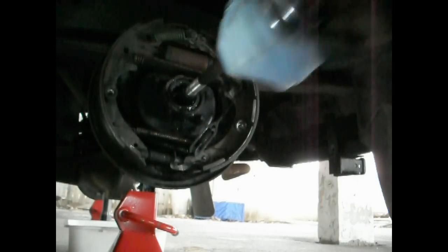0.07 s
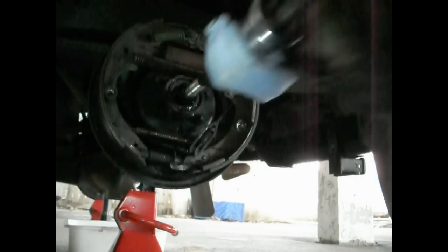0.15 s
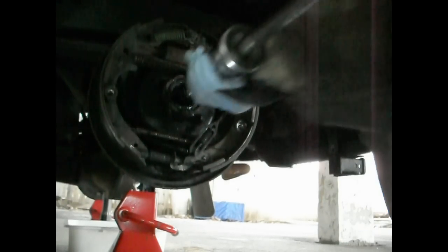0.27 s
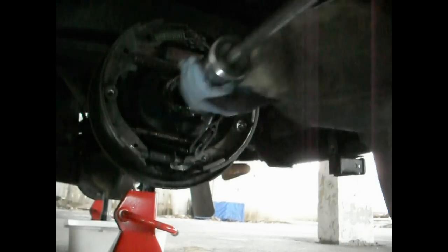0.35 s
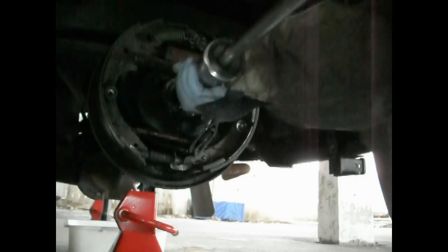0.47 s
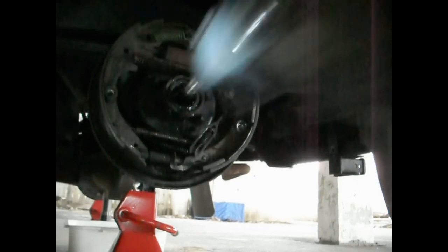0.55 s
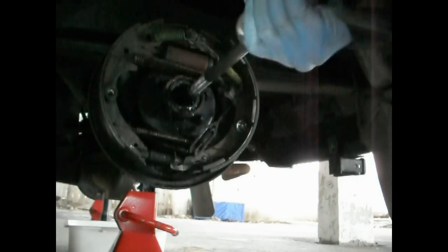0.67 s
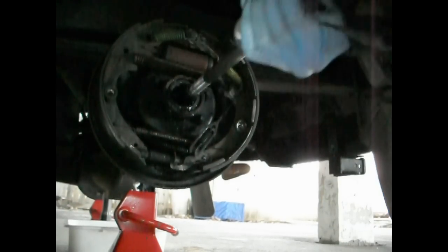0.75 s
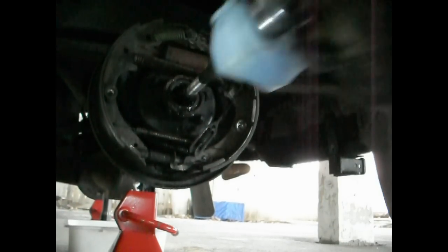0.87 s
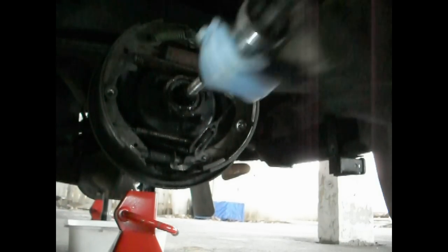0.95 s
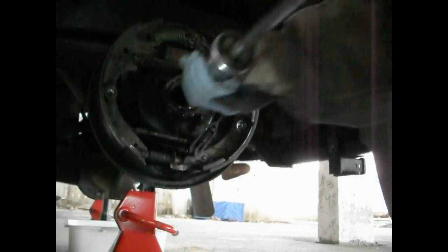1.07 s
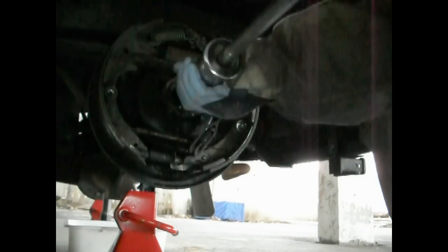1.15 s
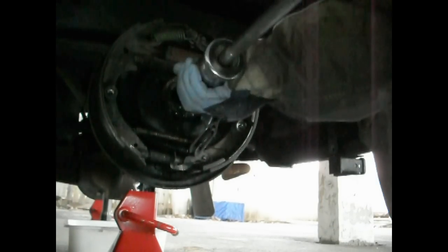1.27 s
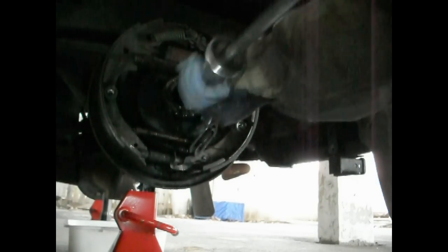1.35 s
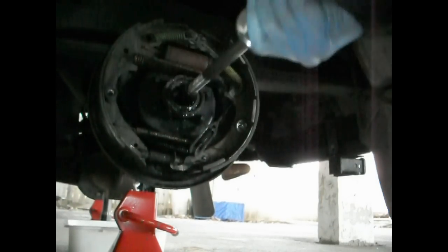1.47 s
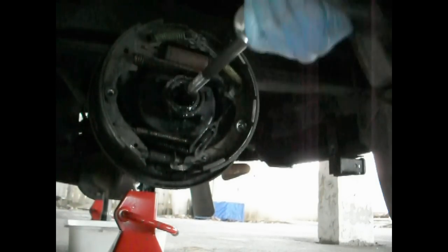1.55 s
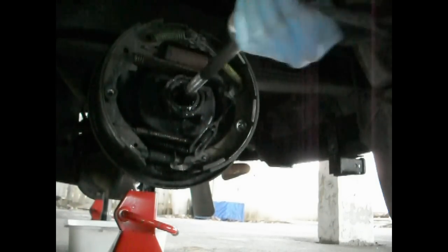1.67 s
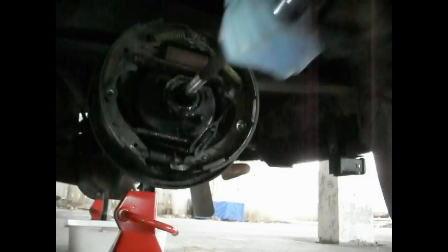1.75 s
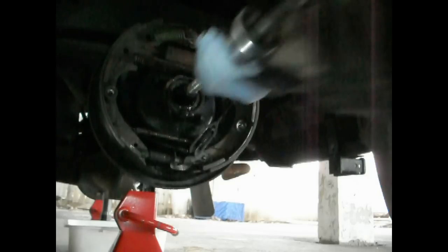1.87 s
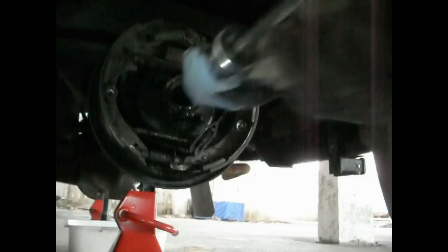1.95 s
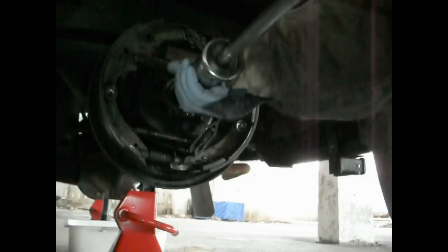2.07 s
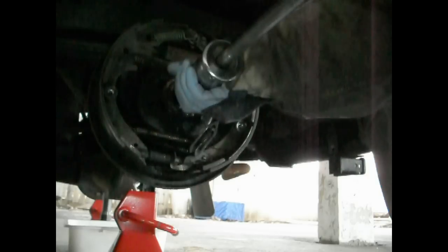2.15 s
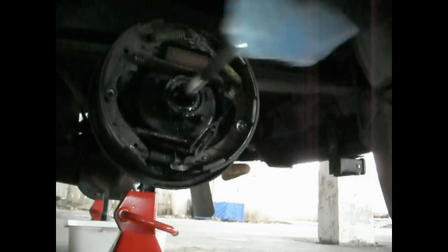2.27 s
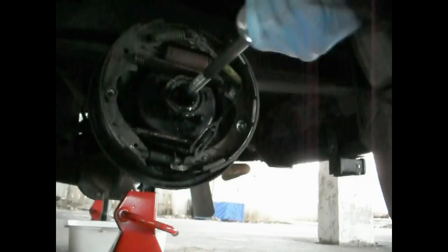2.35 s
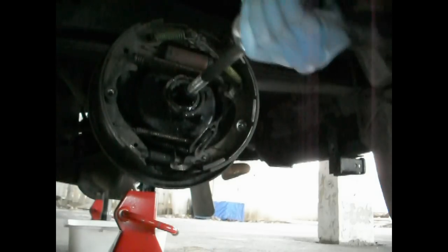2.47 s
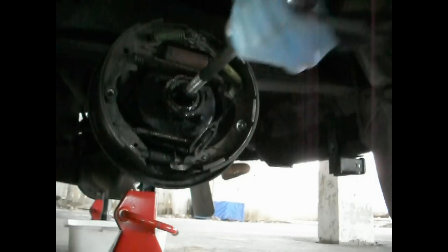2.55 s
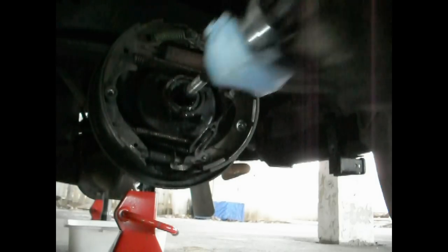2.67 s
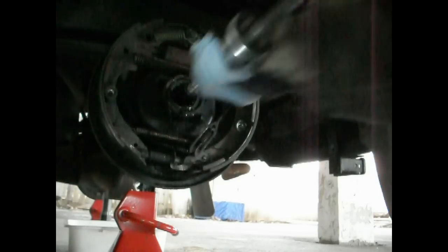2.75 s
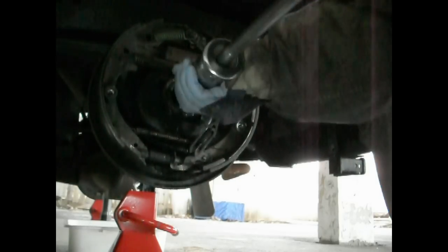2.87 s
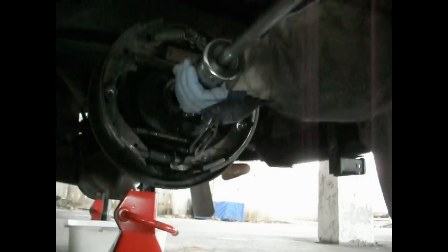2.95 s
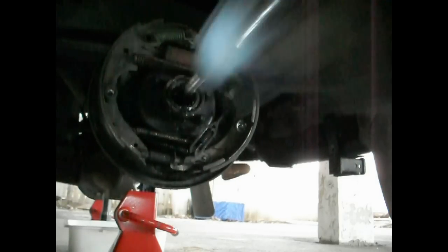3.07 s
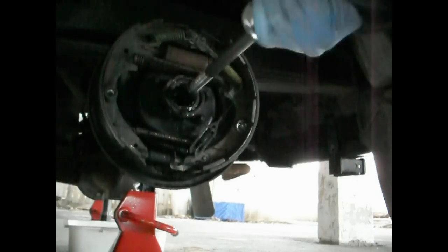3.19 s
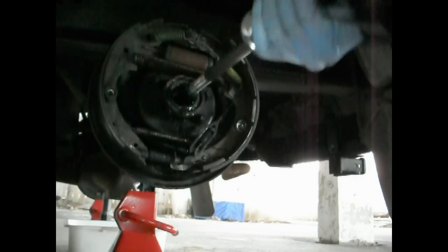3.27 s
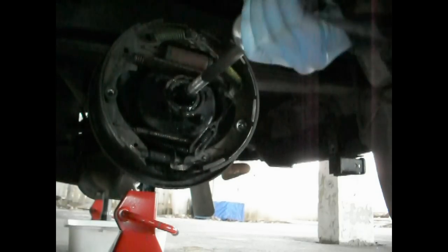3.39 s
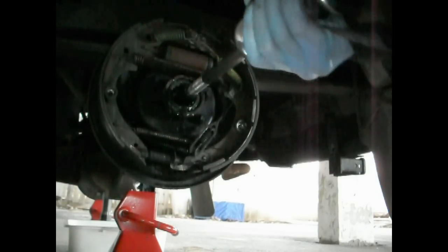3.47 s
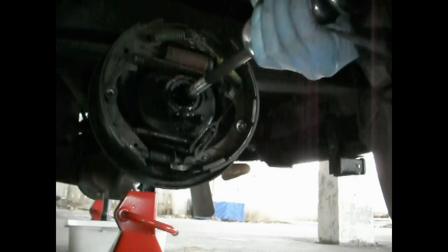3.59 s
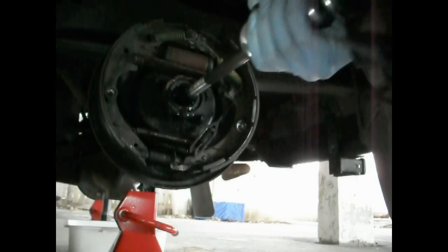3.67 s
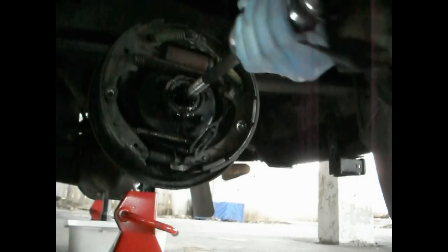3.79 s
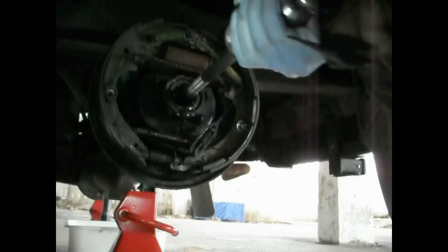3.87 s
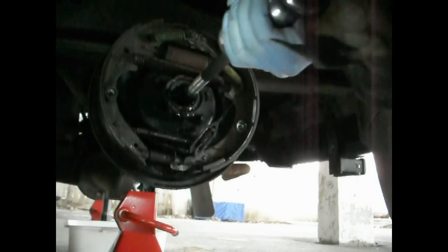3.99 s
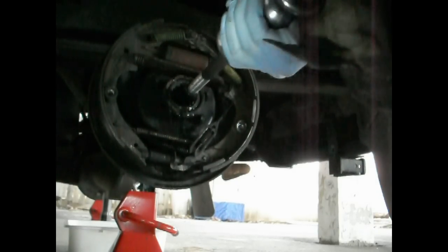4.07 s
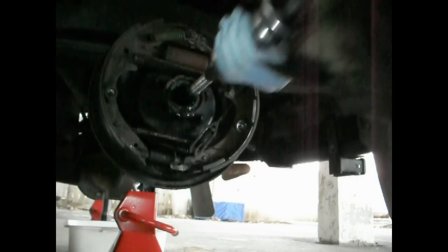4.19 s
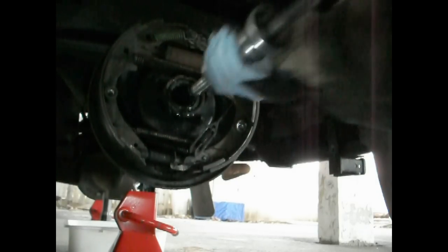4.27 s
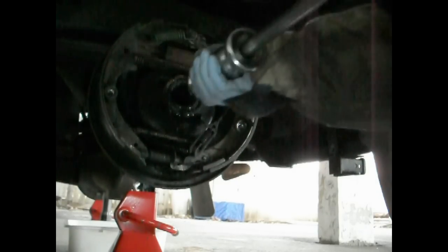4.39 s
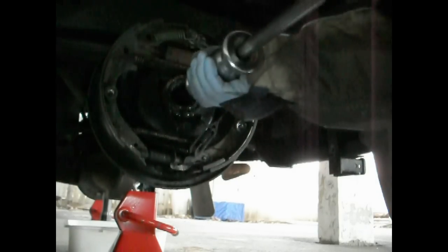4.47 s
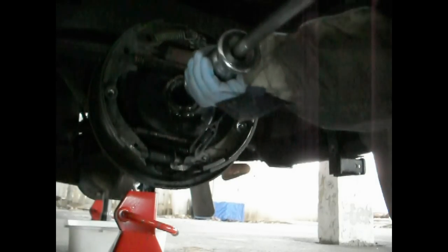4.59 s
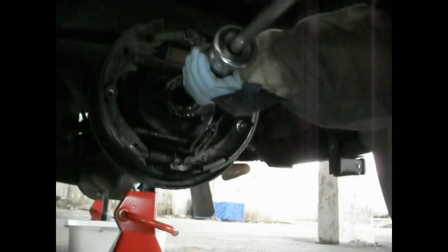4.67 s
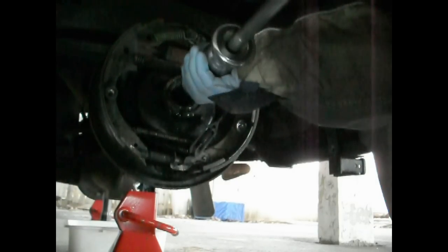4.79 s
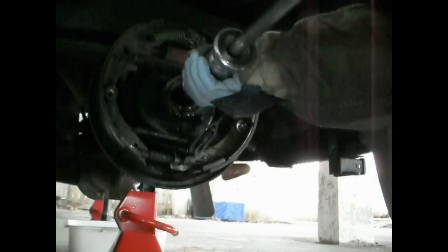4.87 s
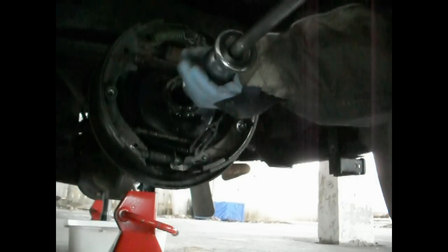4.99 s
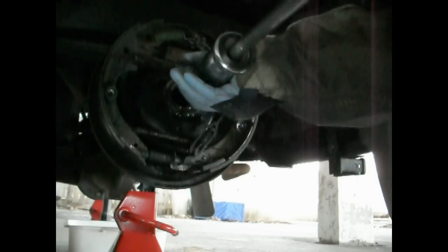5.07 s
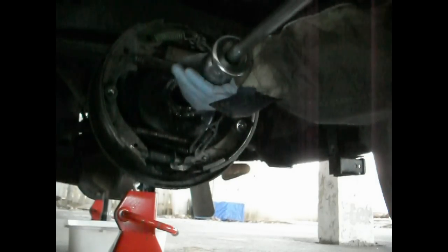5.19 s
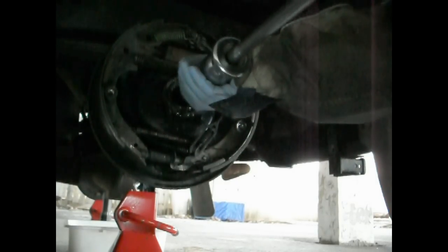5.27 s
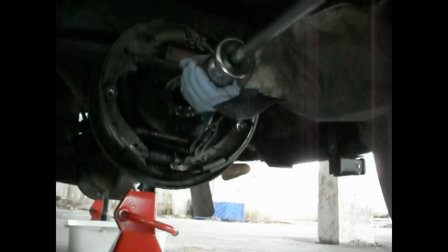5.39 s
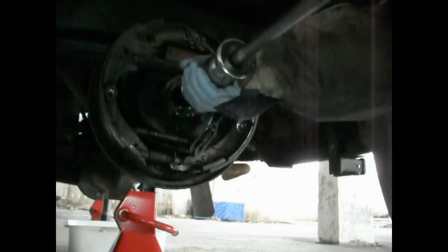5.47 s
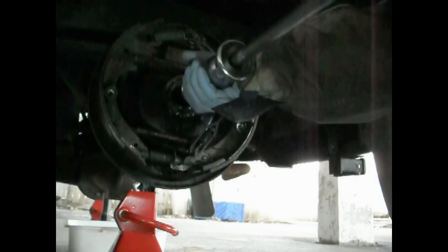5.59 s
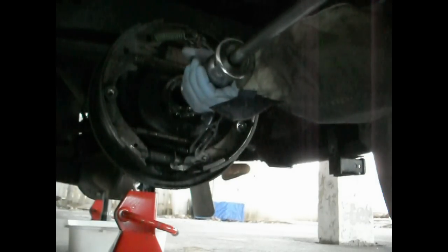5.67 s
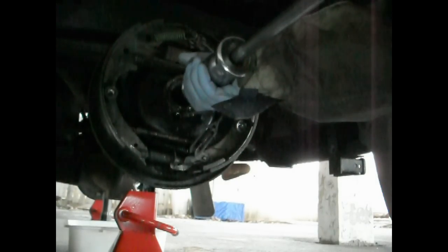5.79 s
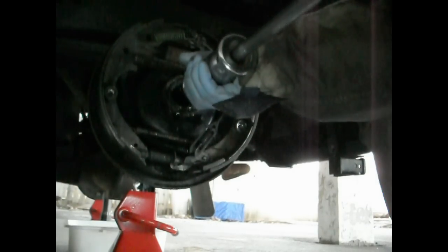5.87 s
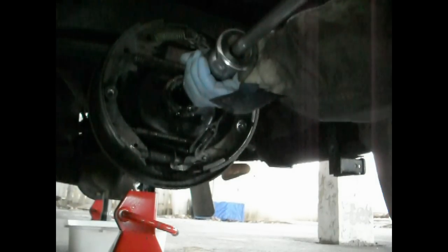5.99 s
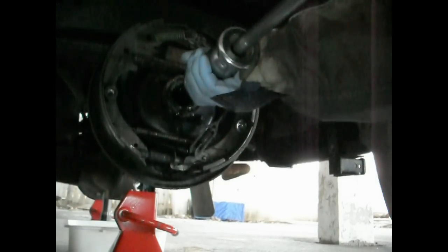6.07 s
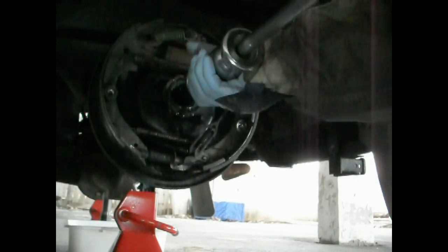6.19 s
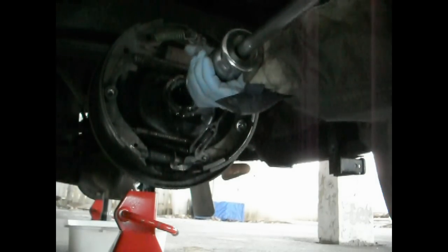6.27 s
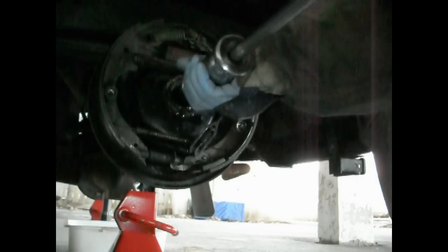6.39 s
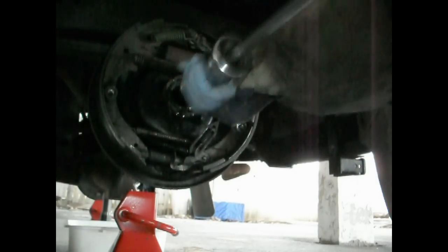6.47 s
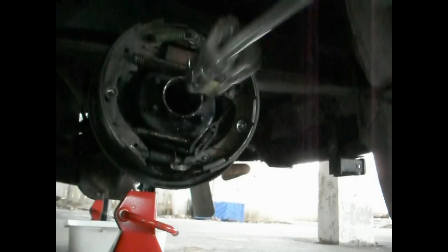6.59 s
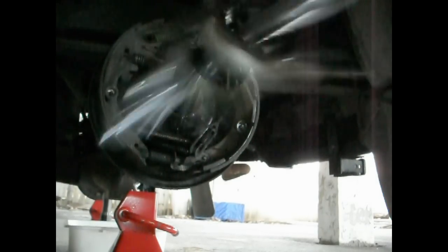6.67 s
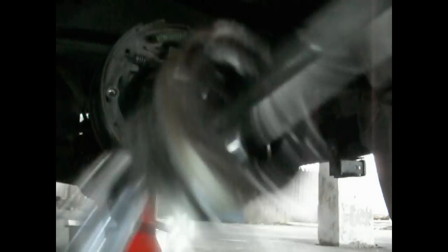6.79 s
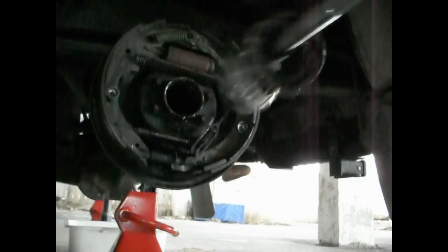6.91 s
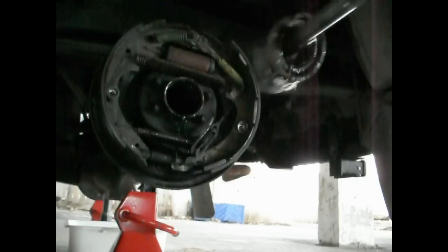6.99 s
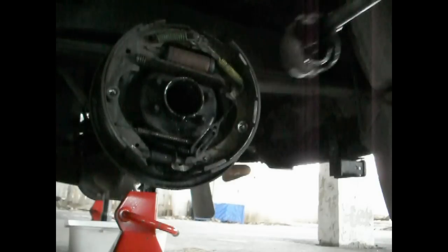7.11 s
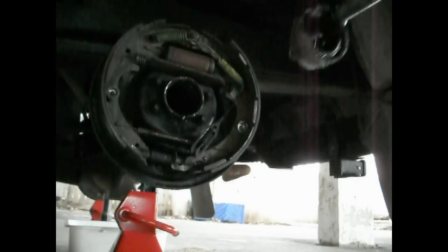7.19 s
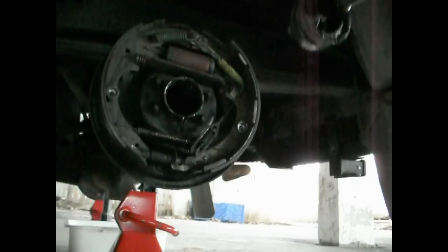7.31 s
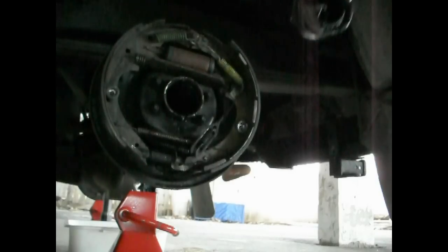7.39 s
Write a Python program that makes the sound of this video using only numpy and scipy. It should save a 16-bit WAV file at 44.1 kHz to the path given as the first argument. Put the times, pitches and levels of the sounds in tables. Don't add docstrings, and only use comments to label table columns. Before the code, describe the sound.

A heavy steel weight slams along a rod in four hard overloaded blows, pauses, then a final crash frees a rattling bearing.

```python
import sys
import numpy as np
from scipy import signal
from scipy.fft import rfft, irfft
from scipy.io import wavfile
from scipy.ndimage import uniform_filter1d

SR = 44100
rng = np.random.default_rng(int(sys.argv[2]) if len(sys.argv) > 2 else 0)


def master_out(mix):
    frames = np.transpose(np.atleast_2d(mix))
    ceiling = np.clip(frames, -1, 1)
    pcm = np.round(ceiling * 32767).astype(np.int16)
    wavfile.write(sys.argv[1], SR, pcm)


def ratio_of_db(decibels):
    return 10 ** (np.asarray(decibels, float) / 20)


N = 328104
T = np.arange(N) / SR
RAIL = .613

# (time [s], level before overload [dB], plate ring [dB], axle thump [dB], ring length factor)
BLOWS = [
    (0.5365, 12.5, 0.5, -1.5, 0.83),
    (1.388, 10.5, 1, 1.5, 0.87),
    (2.2283, 11.5, -1.5, -1.5, 0.94),
    (3.0679, 6, 5, 5.5, 0.78),
    (6.5188, 12.5, -10.5, -13, 0.99),
]
# (frequency [Hz], level [dB], t60 [s])
WEIGHT = [(1450, -8, .05), (2200, -7, .05), (2700, -6, .05), (3300, -6, .05), (3820, -2, .06),
          (4260, -3, .06), (4600, -5, .04), (5700, -6, .05), (6050, -3, .07), (6860, -4, .04),
          (8000, -7, .05), (9668, -4, .09), (10400, -8, .06)]


def band(x, hz, width_hz):
    return signal.lfilter(*signal.iirpeak(min(hz, .45 * SR), hz / width_hz, fs=SR), x)


def fade(t, t60_s):
    return np.exp(-np.log(1000) * t / t60_s)


def noise(size, hz, width_hz):
    x = band(band(rng.standard_normal(size), hz, width_hz), hz, width_hz)
    return x / np.std(x)


def flicker(size, depth_db, span):
    wander = np.sqrt(span) * uniform_filter1d(rng.standard_normal(size), size=span)
    return ratio_of_db(depth_db * wander)


def ring(modes, t, scatter_db, stretch=1):
    hz, db, t60_s = np.transpose(modes)[:, :, None]
    detune, phase, strength = rng.standard_normal((3, 4, len(modes), 1))
    angle = 2 * np.pi * (hz * t * (1 + .012 * detune) + phase)
    waves = np.sin(angle.astype(np.float32))
    level = ratio_of_db(db + scatter_db * strength - 10)
    return np.sum(level * waves * fade(t, t60_s * stretch), axis=(0, 1))


def add(out, start_s, x):
    i = int(start_s * SR)
    out[i:i + len(x)] += x[:N - i]


def camera_noise():
    # (frequency [Hz], level per Hz [dB])
    spectrum = [(35, -21), (60, -10), (103, 2.5), (133, 1), (420, -6), (457, -8), (1110, -10),
                (2080, -15.5), (3270, -16.5), (10500, -26), (13600, -87.5), (22000, -120)]
    # (frequency [Hz], level [dB])
    whines = [(7854, -74), (7881, -73), (3924, -75)]
    # (first time [s], rate [1/s], frequency [Hz], level [dB])
    frame_tick = (.0187, 15, 4600, -52)
    # (frequency [Hz], width [Hz], level [dB])
    low_noise = (23.8, 38, -38.5)
    hiss_db = -45.5

    hz, db = np.transpose(spectrum)
    f = np.arange(1, N // 2 + 2) * SR / N
    shape = ratio_of_db(np.interp(np.log(f), np.log(hz), db))
    hiss = irfft(rfft(rng.standard_normal(N)) * shape, N)
    hiss = ratio_of_db(hiss_db) * hiss / np.std(hiss)

    first_s, rate_hz, tick_hz, tick_db = frame_tick
    since_s = ((T - first_s) * rate_hz) % 1 / rate_hz
    frame_ticks = ratio_of_db(tick_db) * noise(N, tick_hz, 500) * fade(since_s, 0.035)

    whine = sum(np.sqrt(2) * ratio_of_db(d) * np.sin(2 * np.pi * w * T) for w, d in whines)
    rumble_hz, width_hz, rumble_db = low_noise
    rumble = ratio_of_db(rumble_db) * noise(N, rumble_hz, width_hz)
    return hiss + rumble + whine + frame_ticks


def drone():
    # (frequency [Hz], width [Hz], level [dB], rise [s], t60 [s])
    panels = [(188.4, 35, -57, .1, 2.3), (758, 100, -52, .1, 2.05)]
    # (time [s], level [dB], plate ring [dB])
    earlier_blow = (-0.36, 13, 0)
    machine_db, stops_s, fade_s = -53, 4.5, 0.071

    out = ratio_of_db(machine_db) * noise(N, 182, 23) / (1 + np.exp((T - stops_s) / fade_s))
    for hz, width_hz, db, rise_s, t60_s in panels:
        hum = np.zeros(N)
        for s, blow_db, ring_db, *_ in [earlier_blow, *BLOWS]:
            since_s = np.maximum(T - s, 0)
            push_db = blow_db + ring_db / 2
            hum += ratio_of_db(db + push_db) * (1 - np.exp(-since_s / rise_s)) * fade(since_s, t60_s)
        out = out + hum * noise(N, hz, width_hz)
    return out


def rustle():
    # (loudest time [s], half length [s], level [dB])
    rubs = [(7.027, 0.084, -47), (7.185, 0.053, -47.5), (7.326, 0.069, -45.5), (7.44, 0.048, -46.5)]
    swell = sum(ratio_of_db(db) * np.exp(-((T - s) / half_s) ** 2) for s, half_s, db in rubs)
    return swell * flicker(N, 1.5, span=400) * noise(N, 3500, 6300)


def knocks(events, modes, thud_db, wash_db, knock_db, sharp, attack_s, spread):
    dull_hz, knock_db_per_octave, knock_db_per_db = 3900, -0.5, -0.07
    out, t = np.zeros(N), np.arange(int(.18 * SR)) / SR
    for s, db, hz, t60_s, ring_db in events:
        low_db = knock_db + knock_db_per_octave * np.log2(hz / dull_hz) + knock_db_per_db * (db + 27.5)
        near = [(f, d - 8 * abs(np.log2(f / hz)), r) for f, d, r in modes]
        tick = sharp * rng.standard_normal(len(t)) * fade(t, 0.005)
        burst = 0.47 * fade(t, t60_s) * (1 - fade(t, attack_s))
        wash = ratio_of_db(wash_db) * fade(t, 0.64)
        crack = noise(len(t), hz, spread * hz) * (burst + wash)
        low = ratio_of_db(low_db) * noise(len(t), 1300, 2900) * fade(t, 2.4 * t60_s)
        thud = ratio_of_db(thud_db) * noise(len(t), 220, 280) * fade(t, 0.61) * (1 - fade(t, 0.033))
        modal = ratio_of_db(ring_db) * ring(near, t, 3.8)
        add(out, s, ratio_of_db(db) * (tick + crack + low + thud + modal))
    return out


def settling_ticks():
    # (time [s], peak level [dB], centre [Hz], t60 [s])
    events = [(0.0265, -37.5, 1760, 0.17), (1.488, -20.5, 5100, 0.2), (1.538, -21, 2230, 0.078),
              (1.8118, -28.5, 4000, 0.044), (2.3674, -12.5, 2200, 0.011), (2.552, -30.5, 3360, 0.066),
              (3.9701, -34, 1760, 0.067), (4.508, -30, 3300, 0.062), (5.2474, -35.5, 1520, 0.036),
              (5.8417, -27, 3960, 0.043), (6.293, -42, 2990, 0.06)]
    return knocks([(*row, -5) for row in events], WEIGHT, thud_db=-34.5, wash_db=-28.5, knock_db=-18,
                  sharp=.05, attack_s=0.0034, spread=0.76)


def scuffs():
    # (time [s], peak level [dB], centre [Hz], t60 [s], ring [dB])
    events = [(0.2858, -26.5, 3430, 0.14, -11), (0.3221, -28, 3620, 0.11, -8),
              (0.9898, -31.5, 2500, 0.24, -5), (1.3144, -24, 4130, 0.24, -17),
              (1.881, -31, 3520, 0.54, -12), (2.7248, -29, 2930, 0.54, -20),
              (2.7584, -26.5, 2830, 0.37, -8), (3.003, -19, 2700, 0.15, -14), (3.025, -23.5, 4100, 0.53, 0),
              (4.2947, -32.5, 2680, 0.26, -9), (6.45, -25, 4500, 0.11, -10), (6.4572, -20, 3100, 0.24, -6)]
    return knocks(events, WEIGHT, thud_db=-34, wash_db=-29.5, knock_db=-14.5,
                  sharp=.02, attack_s=0.012, spread=0.66)


def chatter():
    # (time [s], peak level [dB], centre [Hz], t60 [s], ring [dB])
    events = [(0.25, -38, 3720, 0.09, -11), (0.4296, -16.5, 3770, 0.089, -16.5),
              (0.4397, -19.5, 6700, 0.024, -6.5), (0.4674, -22.5, 4460, 0.06, -12),
              (0.4878, -27, 4400, 0.072, -18), (0.5014, -24, 3470, 0.061, -0.5),
              (0.5174, -7.5, 4530, 0.022, -6.5), (1.08, -32.5, 3800, 0.14, -12),
              (1.3007, -20, 3940, 0.043, -25), (1.339, -14, 4400, 0.073, -15),
              (1.358, -19, 6000, 0.033, -12), (1.3678, -12.5, 4400, 0.1, -24),
              (2.15, -11, 5360, 0.022, -12.5), (2.17, -20, 4430, 0.045, -12),
              (2.214, -18.5, 4500, 0.0394, -12), (2.1886, -9.5, 3370, 0.09, -23),
              (2.9776, -19.5, 4140, 0.057, -2.5)]
    return knocks(events, WEIGHT, thud_db=-32, wash_db=-29, knock_db=-18,
                  sharp=0.073, attack_s=0.0043, spread=0.84)


def weight_returns():
    # (time [s], peak level [dB], centre [Hz], t60 [s])
    events = [
        (0.3542, -3.5, 5230, 0.044),
        (1.1081, -6, 5130, 0.052),
        (1.1255, -12, 3660, 0.022),
        (1.9712, -10, 3230, 0.082),
        (1.9754, -2, 5800, 0.042),
        (2.8059, -5, 4130, 0.047),
        (2.8111, -4.5, 4860, 0.048),
        (2.8385, -13.5, 3470, 0.044),
    ]
    return knocks([(*row, -9) for row in events], WEIGHT, thud_db=-36, wash_db=-39.5, knock_db=-18,
                  sharp=.1, attack_s=0.0034, spread=0.98)


def bearing_rattles():
    # (time [s], peak level [dB], centre [Hz], t60 [s], ring [dB])
    events = [(6.5746, -16, 2000, 0.021, -1), (6.5995, -16.5, 3820, 0.051, -2),
              (6.607, -10.5, 7000, 0.025, -18), (6.6582, 2, 6400, 0.022, -11.5),
              (6.6715, -4.5, 4200, 0.09, -10), (6.6894, -20, 4650, 0.04, 0),
              (6.7108, 0.5, 4100, 0.022, -14.5), (6.7785, -11, 5300, 0.02, -28),
              (6.8105, -25, 4400, 0.03, -16), (6.8241, -6, 5800, 0.019, -10.5),
              (6.8476, -12, 5500, 0.024, -10), (6.8688, -14, 8900, 0.045, 1),
              (6.8967, -14.5, 4570, 0.017, -4), (6.902, -14.5, 5280, 0.027, 0.5),
              (6.9122, -33, 4180, 0.015, -11), (6.9376, -21.5, 4150, 0.056, -10),
              (7.0063, -28.5, 4900, 0.053, -20), (7.038, -32.5, 4500, 0.04, -10)]
    # (frequency [Hz], level [dB], t60 [s])
    bearing = [(3250, -5, .04), (4120, -2, .07), (4500, -5, .05), (5400, -4, .04), (6050, 0, .05),
               (7400, -6, .04), (8050, -2, .04), (9668, -8, .04), (10350, -3, .08)]
    return knocks(events, bearing, thud_db=-49, wash_db=-43.5, knock_db=-20.5,
                  sharp=.12, attack_s=0.0027, spread=0.9)


def slides():
    # (start [s], hardest time [s], end [s], level [dB], centre [Hz])
    strokes = [(0.246, 0.248, 0.274, -38, 3800), (0.271, 0.293, 0.35, -49, 3780),
               (0.425, 0.442, 0.465, -25.5, 5200), (0.458, 0.491, 0.51, -23.5, 4230),
               (0.526, 0.529, 0.535, -36, 4630), (1.0, 1.04, 1.065, -43, 3820),
               (1.304, 1.34, 1.385, -30, 4320), (1.886, 1.966, 1.97, -39, 3850),
               (2.146, 2.19, 2.225, -20.5, 3690), (2.716, 2.773, 2.805, -38.5, 2710),
               (2.805, 2.824, 2.86, -21, 4700), (3.0, 3.025, 3.06, -17, 3835),
               (4.19, 4.218, 4.27, -49, 3320), (4.279, 4.33, 4.385, -42.5, 3000),
               (4.458, 4.487, 4.6, -50, 3600), (6.041, 6.126, 6.35, -51, 3730),
               (6.447, 6.478, 6.495, -18.5, 3200), (6.504, 6.515, 6.52, -23.5, 3500),
               (6.597, 6.653, 6.66, -28.5, 5300), (6.663, 6.661, 6.7, -8.5, 4500),
               (6.712, 6.712, 6.735, -22, 3700), (6.791, 6.85, 6.885, -32, 4870),
               (6.892, 6.892, 6.97, -20, 4630)]
    start_db, end_db = -17.5, -23
    sing_db, rod_db, rod_hz, sing_db_per_db = -3, -14, 9668, -.5
    out = np.zeros(N)
    for start_s, hardest_s, end_s, db, centre_hz in strokes:
        t = np.arange(start_s, end_s, 1 / SR)
        grit = rng.standard_normal(len(t)) * flicker(len(t), 4.5, span=70)
        press = np.clip((db + 52) / 5, .5, 2.5)
        x = 0
        for f, d, _ in WEIGHT:
            body = band(band(grit, f, .45 * f), f, .45 * f)
            flare = press * flicker(len(t), 4, span=500) * band(body, f, 140)
            x = x + ratio_of_db(.6 * d - 11 * abs(np.log2(f / centre_hz))) * (body + flare)
        x = x / np.sqrt(uniform_filter1d(x ** 2, size=1500))
        if start_s < BLOWS[-2][0]:
            for f, d in [(centre_hz, sing_db), (rod_hz, rod_db)]:
                gain = ratio_of_db(d + sing_db_per_db * (db + 38))
                x = x + gain * flicker(len(t), 4, span=500) * noise(len(t), f, 80)
        edge = np.clip(np.minimum(t - t[0], t[-1] - t) / 0.0013, 0, 1)
        swell_db = np.interp(t, [start_s, hardest_s, end_s], [start_db, 0, end_db])
        add(out, start_s, x * edge * ratio_of_db(db + swell_db))
    return out


def blows():
    # (frequency [Hz], crash [dB], crash t60 [s], tail [dB], tail t60 [s])
    crash = [(151, -19.5, 0.27, -22.5, 0.82), (308, -14, 0.13, -22, 0.91), (600, -13.5, 0.14, -20, 0.76),
             (824, -5.5, 0.087, -25, 1), (1604, -8, 0.18, -37.5, 0.71), (2295, 4.5, 0.062, -21.5, 0.95),
             (3470, 2.5, 0.1, -47, 0.93), (5300, 2.5, 0.096, -19.5, 0.57), (6900, 8, 0.071, -51.5, 0.72),
             (9530, -16.5, 0.11, -104, 0.17)]
    # (frequency [Hz], width [Hz], level [dB], t60 [s])
    crowds = [(5200, 910, -20, 0.65), (1055, 85, -14.5, 0.37)]
    # (frequency [Hz], level [dB], t60 [s])
    plate_modes = [(619, -4, .4), (680, -7, .43), (780, -11, .8), (974, -8, .45), (1104, -18, 1.0),
                   (2121, -11, .8), (2600, -9, .55), (3214, -14, .55), (4060, -16, .5), (4950, -15, .45),
                   (5350, -15, .45), (5850, -12, .45), (7900, -20, .35), (9650, -22, .5)]
    # (frequency [Hz], width [Hz], level [dB], t60 [s])
    axle = [(65, 34, -10.5, 0.8), (103.4, 47, -11.5, 0.83), (155.3, 42, -5.5, 0.42),
            (223.4, 28, -14.5, 0.59), (332, 28, -1.5, 0.27), (473, 82, -3, 0.26)]
    tube_hz, tube_db, tube_t60_s = 101.94, -1, 0.81
    beat_hz, beat_peak_s = 10.6, .072

    out, t = np.zeros(N), np.arange(int(.8 * SR)) / SR
    for s, blow_db, ring_db, thump_db, stretch in BLOWS:
        x = 0
        for hz, crash_db, crash_t60_s, tail_db, tail_t60_s in crash:
            shape = ratio_of_db(crash_db) * fade(t, crash_t60_s)
            shape = shape + ratio_of_db(tail_db + ring_db) * fade(t, tail_t60_s * stretch)
            rise = 1 - np.exp(-t * hz / 0.6)
            x = x + rise * shape * flicker(len(t), 1.75, span=600) * noise(len(t), hz, 0.77 * hz)
        for hz, width_hz, db, t60_s in crowds:
            x = x + ratio_of_db(db + ring_db) * fade(t, t60_s * stretch) * noise(len(t), hz, width_hz)

        plate = ratio_of_db(ring_db - 24.5) * ring(plate_modes, t, 2, stretch)

        thump = np.zeros(len(t))
        for hz, width_hz, db, t60_s in axle:
            thump += ratio_of_db(db) * noise(len(t), hz, width_hz) * fade(t, t60_s * stretch)
        beat = np.cos(np.pi * beat_hz * (t - beat_peak_s))
        sway = np.sin(2 * np.pi * tube_hz * t) * beat * fade(t, tube_t60_s * stretch)
        thump = thump + ratio_of_db(tube_db) * sway
        thump = ratio_of_db(thump_db - 19.5) * (1 - np.exp(-t / 0.043)) * thump
        add(out, s, ratio_of_db(blow_db - 14) * x + ratio_of_db(blow_db) * (plate + thump))
    return out


def scene():
    background = camera_noise() + drone() + rustle()
    contacts = settling_ticks() + scuffs() + chatter() + weight_returns() + bearing_rattles()
    return (background + contacts + slides() + blows())[None]


def bias():
    # (time constant [s], weight)
    stages = [(.0324, 1), (.0681, -.617), (.208, .0688)]
    # (time [s], bias kick)
    kicks = [
        (-.47, 27),
        (2.2295, 5.1),
        (3.0681, 23),
        (6.522, 5.2),
    ]
    hold_s_per_kick = .00015
    out = np.zeros(N)
    for s, kick in kicks:
        t = np.maximum(T - s, 0)
        held = np.maximum(t - kick * hold_s_per_kick, 0)
        swing = sum(weight * np.exp(-held / tau_s) for tau_s, weight in stages)
        out += kick * (1 - np.exp(-t / .004)) * swing
    return out


def roll_off(x):
    return signal.sosfilt(signal.butter(12, 16460, fs=SR, output="sos"), x)


def record(dry):
    mic_hz, leak_db = 10700, 21
    mirror_hz, mirror_end_hz, top_hz = 11000, 11800, 16100
    bend_db, edge_db, out_db = -12, 0, 0

    mic = signal.sosfilt(signal.ellip(4, .5, leak_db, mic_hz, fs=SR, output="sos"), dry)
    drift = bias()
    railed = np.clip(mic + drift, -RAIL, RAIL)

    stored = 2 * railed * (np.arange(N) % 2 == 0)
    main = signal.sosfiltfilt(signal.butter(10, mirror_hz, fs=SR, output="sos"), stored)
    main = signal.sosfiltfilt(signal.ellip(6, .3, 30, mirror_end_hz, fs=SR, output="sos"), main)

    spill = railed + ratio_of_db(bend_db) * (railed - np.clip(drift, -RAIL, RAIL)) ** 2
    above = signal.ellip(5, .1, 40, [mirror_end_hz, top_hz], "band", fs=SR, output="sos")
    harsh = signal.sosfiltfilt(above, spill)

    mix = np.clip(ratio_of_db(out_db) * (main + ratio_of_db(edge_db) * harsh), -1, 1)
    return roll_off(mix)


dry = scene()
out = record(dry)
master_out(out)
```